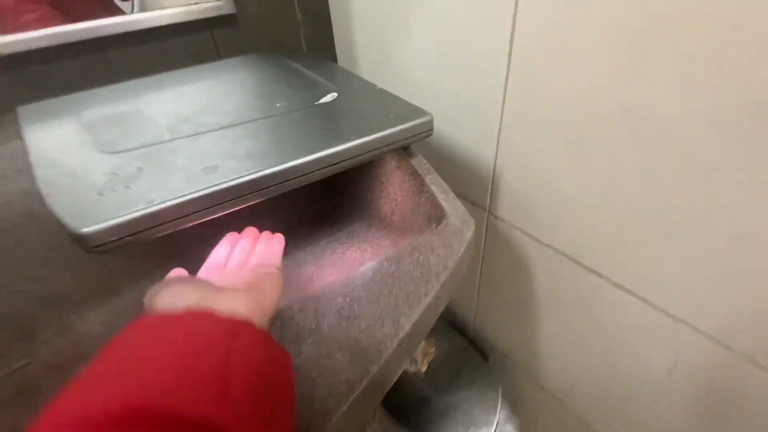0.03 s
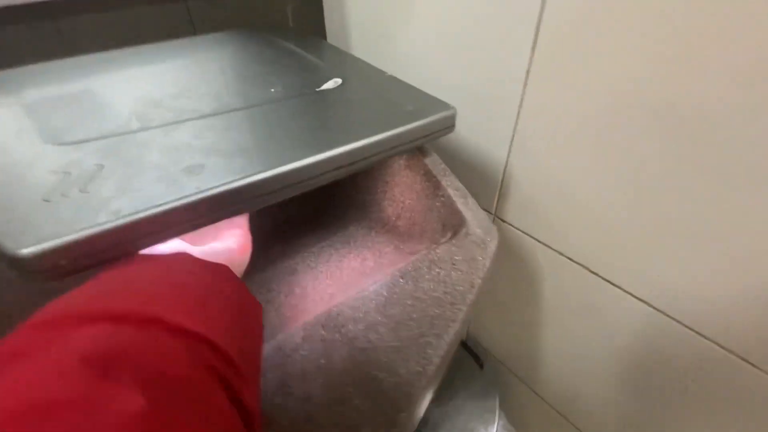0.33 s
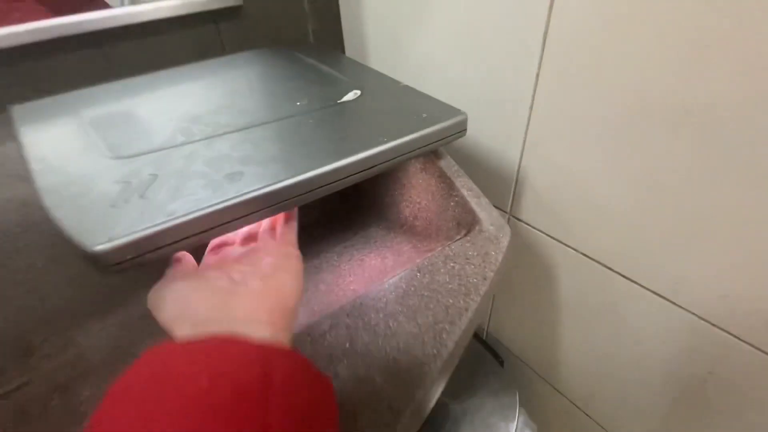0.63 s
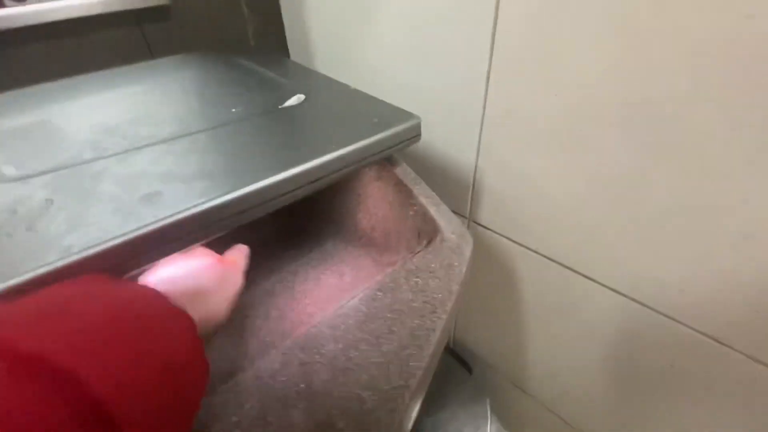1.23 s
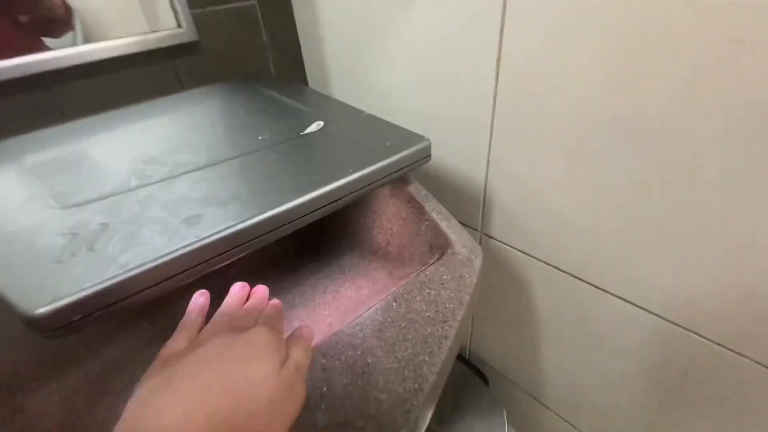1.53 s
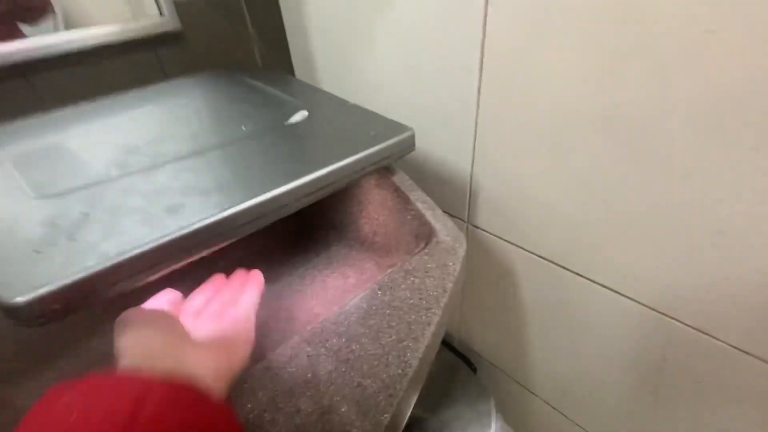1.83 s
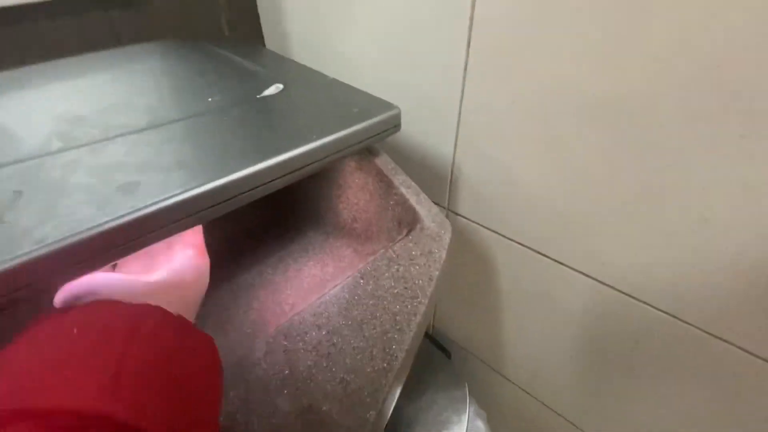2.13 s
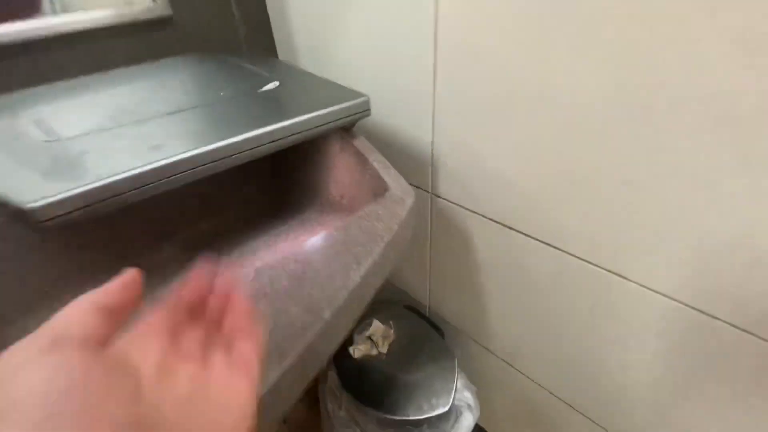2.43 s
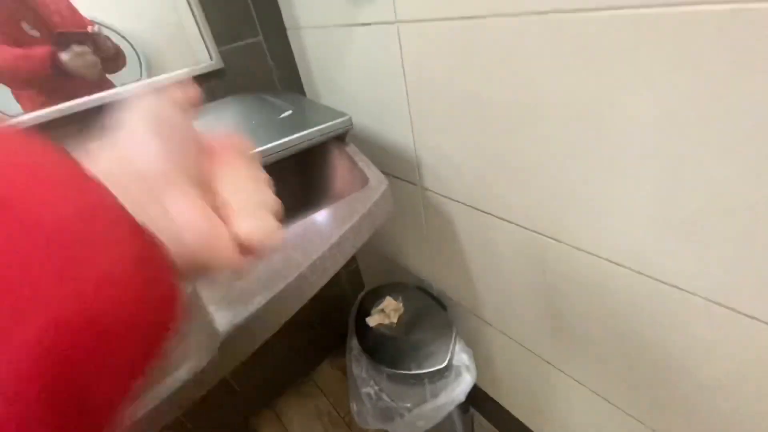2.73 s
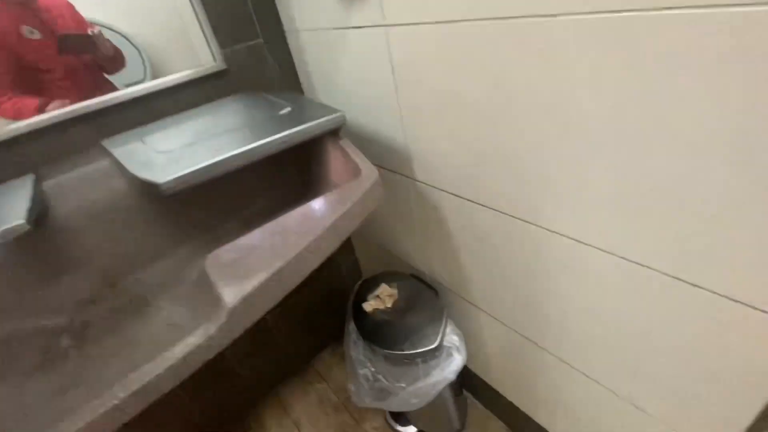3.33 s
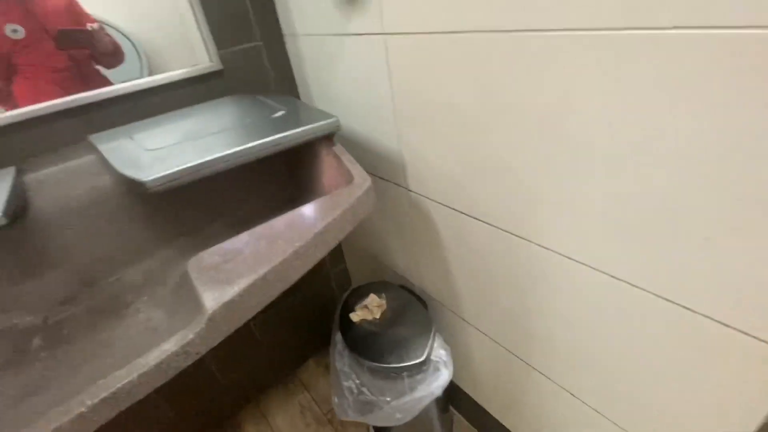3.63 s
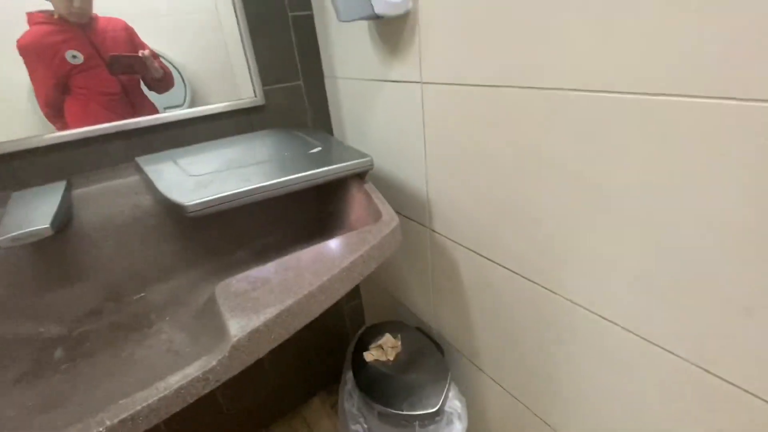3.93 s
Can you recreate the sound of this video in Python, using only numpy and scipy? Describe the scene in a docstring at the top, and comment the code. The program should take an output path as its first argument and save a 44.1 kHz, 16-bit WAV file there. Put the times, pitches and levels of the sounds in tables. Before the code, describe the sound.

Loud air rushes from a nearby hand dryer over a hum, a wavering whistle and a gusty rumble. The hiss brightens in spurts as a hand turns under it, then evens out in the small restroom.

```python
"""A hand dryer built into a washbasin blows a broad air jet in a small tiled restroom.
A hand moves in the jet, cutting it into bright hiss and cupping it into a hollow note. The turbine
hums at its shaft rate and whistles at its blade rate; housing, duct and basin ring in the air stream
over a gusty rumble. Then the hand withdraws and the listener steps back."""
import sys
import numpy as np
from scipy import signal
from scipy.fft import rfft, irfft
from scipy.io import wavfile
from scipy.ndimage import map_coordinates

SR = 44100
rng = np.random.default_rng(int(sys.argv[2]) if len(sys.argv) > 2 else 0)


def put_to_file(sound):
    """Save the sound as 16-bit audio at rate SR, in the file named by the first command-line argument."""
    columns = np.atleast_2d(sound).T  # one column per channel
    safe = np.clip(columns, -1, 1)
    whole_steps = np.round(safe * 32767)
    wavfile.write(sys.argv[1], SR, whole_steps.astype(np.int16))


N = 176400
T = np.arange(N) / SR
FREQS = np.arange(N // 2 + 1) * SR / N

# Air washing over hand and basin. Each row: time in seconds, level in dB.
WASH_LEVEL_DB = [(0, -28.5), (.5, -27.5), (.8, -30), (.95, -27), (1.1, -28.5), (1.45, -26), (1.62, -28.5),
                 (1.78, -28.5), (1.92, -27.5), (2.2, -30), (2.42, -37.5), (2.75, -34.5), (4, -49)]


def air_jet():
    """Turbulence of the free jet, of its wash over the hand and of the fingers cutting it."""
    # Free jet as the listener moves. Each row: time in seconds, level in dB.
    jet_level_db = [(0, -25.5), (1.2, -26.5), (2.3, -24.5), (2.65, -27), (2.8, -28), (3.25, -27.5),
                    (3.5, -26.5), (4, -26.5)]
    # Spectra of free jet, wash and cut jet. Each row: frequency in Hz, relative density in dB.
    jet_spectrum = [(150, -17), (300, -2), (650, 2), (1000, -2), (1400, -2.5), (2400, -3.5), (3500, -1.5),
                    (5500, 0.5), (8300, -0.3), (9500, -0.5), (11200, -5), (12000, -14), (15000, -14)]
    wash_spectrum = [(30, -13), (70, 0.5), (130, -2.5), (330, 2.5), (500, -4), (750, 1.5), (1500, -0.5),
                     (2200, 1), (3100, 0.5), (4500, 2), (7500, -2), (11000, -11), (15000, -16)]
    cut_spectrum = [(600, -5.5), (1400, -20), (1950, 5.5), (2800, 9.5), (3800, 5.5), (5000, 8.5),
                    (6600, 6.5), (8500, 7.5), (11000, 1), (13000, -10), (15000, -5)]
    jet = undb(curve(jet_level_db) + .12 * wander(rate_hz=9.8))
    wash = undb(curve(WASH_LEVEL_DB) + wander(rate_hz=42))
    layers = [(colour(jet_spectrum), jet),
              (colour(wash_spectrum), wash),
              (colour(cut_spectrum), finger_cuts())]
    return hand_shimmer(restroom(layers))


def finger_cuts():
    """Envelope of the spluttering hiss where the hand cuts the jet near the slot."""
    # Each row: start in seconds, end in seconds, level in dB.
    cuts = [(0.603, 0.712, -22.5), (0.75, 0.748, -26), (0.846, 0.852, -25.5), (1.43, 1.557, -33.5),
            (1.763, 1.824, -26.5), (2.266, 2.351, -22.5)]
    # A finger's edge crosses the slot. Each row: time in seconds, peak in dB.
    spurts = [(0.627, -31), (0.649, -31), (0.696, -35), (0.71, -34), (2.304, -30), (2.338, -33)]
    held = sum(undb(db) * gesture(start_s, end_s) for start_s, end_s, db in cuts)
    return (held + swells(spurts, width_s=.008)) * undb(1.3 * wander(rate_hz=60))


def hand_shimmer(hiss):
    """The moving hand recolours the hiss: half-octave bands drift in level, more in a strong wash."""
    band_position = np.clip(2 * np.log2((FREQS + 1) / 500), 0, 10)
    spectrum = rfft(hiss)
    wash_db = curve(WASH_LEVEL_DB)
    depth_db = 1.5 * undb(wash_db - wash_db.max())
    bands = (irfft(spectrum * np.maximum(1 - abs(band_position - k), 0), N) for k in range(11))
    return sum(band * undb(depth_db * wander(rate_hz=21)) for band in bands)


def cupped_palm():
    """The palm's cavity rings with a hollow note that rises as the hand turns in the jet."""
    # Each row: start and end in seconds, pitch at start and at end in Hz, width in Hz, level in dB.
    cups = [(0.635, 0.648, 1880, 1960, 90, -35), (0.65, 0.71, 2880, 2960, 220, -40),
            (1.44, 1.588, 2914, 3030, 210, -29), (1.65, 1.801, 3100, 3200, 550, -32)]
    notes = np.zeros((2, N))
    for start_s, end_s, from_hz, to_hz, width_hz, db in cups:
        glide_hz = (to_hz - from_hz) * np.clip((T - start_s) / max(end_s - start_s, .01), -1, 1)
        rings = signal.hilbert([noise(resonance(from_hz, width_hz)) for _ in range(2)])
        gliding = np.real(rings * np.exp(2j * np.pi * np.cumsum(glide_hz) / SR))
        notes += gliding * undb(db) * gesture(start_s, end_s)
    return notes


def turbine():
    """Shaft harmonics; the ninth is the blade whistle, swelling and fading among tile reflections."""
    # Harmonic levels. Each row: time in seconds, level in dB.
    hum_db = [(0, -45.5), (.9, -65), (1.15, -42), (1.6, -44), (1.95, -40.5), (2.4, -41), (2.9, -40),
              (4, -39.5)]
    whistle_db = [(0, -55), (.15, -35), (.27, -48), (.38, -40), (.5, -47), (.69, -40), (.745, -32),
                  (.8, -42), (.91, -35), (1.0, -38), (1.1, -45), (1.24, -33), (1.46, -34), (1.54, -50),
                  (1.9, -37.5), (2.12, -40), (2.2, -32), (2.28, -45), (2.41, -37), (2.52, -44), (2.61, -39),
                  (2.67, -28.5), (2.75, -52), (2.85, -46), (2.96, -39), (3.08, -37), (3.24, -43.5),
                  (3.39, -37.5), (3.49, -32.5), (3.64, -40), (3.79, -35.5), (3.88, -32.5), (4, -34.5)]
    octave_db = [(0, -50), (1.2, -47), (1.8, -45.5), (2.2, -49.5), (2.65, -49), (2.85, -60), (4, -53)]
    whine_db = [(0, -47), (2.3, -52), (2.45, -44), (2.7, -42), (2.81, -51), (2.97, -39), (3.22, -42),
                (3.4, -62), (3.65, -43), (4, -49)]
    shaft_hz = (515 + .25 * T) * (1 + .0003 * wander(rate_hz=2.8))
    shaft_rad = 2 * np.pi * np.cumsum(shaft_hz) / SR

    def harmonic(level_db, order, waver, pan_left_db, right_lag_rad):
        """One tone, scattered by the moving air separately in each channel."""
        scatter = np.array([1 + waver * (wander(35) + 1j * wander(41)) for _ in range(2)])
        phase_rad = np.array([order * shaft_rad, order * shaft_rad - right_lag_rad])
        tone = np.real(scatter * np.exp(1j * phase_rad))
        return unit_rms(tone * pan(pan_left_db)) * undb(curve(level_db))

    return (harmonic(hum_db, order=1, waver=.05, pan_left_db=8, right_lag_rad=1.3)
            + harmonic(whistle_db, order=9, waver=.3, pan_left_db=0, right_lag_rad=.9)
            + harmonic(octave_db, order=2, waver=.16, pan_left_db=18, right_lag_rad=1)
            + harmonic(whine_db, order=6, waver=.41, pan_left_db=8, right_lag_rad=1))


def housing():
    """Air rings the blower housing; one strong mode swells now and then."""
    # Each row: frequency in Hz, width in Hz, level in dB.
    modes = [(949, 29, -53.5), (1145, 66, -49), (1586, 32, -45), (1678, 34, -43.5), (1728, 66, -43.5),
             (3500, 58, -45.5)]
    # Swells of the fourth mode. Each row: time in seconds, peak in dB.
    mode_swells = [(0.34, -39), (1.13, -37), (1.5, -40), (2.2, -40), (2.7, -44.5), (3.23, -40), (3.76, -45)]
    rings = np.array([ringing(modes), ringing(modes)])
    hz, width_hz, _ = modes[3]
    surge = noise(resonance(hz, width_hz)) * swells(mode_swells, width_s=.081)
    return (rings + surge) * undb(wander(rate_hz=21))


def duct_drone():
    """Low resonances of duct and basin, nearly alike in both channels."""
    # Each row: frequency in Hz, width in Hz, level in dB.
    modes = [(81, 9.8, -49.5), (117.4, 21, -51), (168.7, 22, -45.5), (224.5, 15, -51.5), (293.2, 24, -46.5),
             (370, 17, -53.5)]
    mid, side = ringing(modes), .13 * ringing(modes)
    return np.array([mid + side, mid - side]) * pan(left_db=-.5)


def buffet():
    """Gusty rumble of the air stream."""
    # Each row: frequency in Hz, relative density in dB.
    rumble_spectrum = [(20, -24), (40, -12), (65, 1.5), (85, 9), (140, 3.5), (300, -19), (800, -45)]
    # Each row: time in seconds, level in dB.
    rumble_db = [(0, -44), (.17, -39.5), (.27, -51), (.42, -36.5), (.75, -46.5), (.9, -58), (1, -46),
                 (1.18, -42), (1.29, -40.5), (1.45, -55), (2.1, -44.5), (2.7, -60), (3.25, -69),
                 (3.42, -42), (3.7, -55), (4, -50)]
    gusts_db = 1.1 * wander(rate_hz=6)
    mid, side = noise(colour(rumble_spectrum)), .31 * noise(colour(rumble_spectrum))
    return np.array([mid + side, mid - side]) * undb(curve(rumble_db) + gusts_db)


def restroom(layers):
    """Noise from (spectral gain, envelope) layers, heard direct, reflected and as a diffuse field."""
    # Direct sound. Each row: time in seconds, lag of the right channel in ms.
    right_lag_ms = [(0, 0.43), (.6, 0.31), (2.4, 0.31), (3, 0.47), (4, 0.48)]
    # Echoes off basin, lid and tiles. Each row: left and right base delay in ms, gain in dB.
    echoes = [(1.25, 1.5, -9), (2.3, 2.0, -10.5), (4.1, 4.9, -6), (7.4, 6.2, -6), (11.3, 12.2, 0),
              (16.5, 15.4, -3)]
    # The listener sways and steps back. Each row: time in seconds, factor on the echo delays.
    path_stretch = [(0, 1.11), (1, 1.07), (2.3, 1.024), (2.8, 1.12), (4, 1.165)]
    t60_s, diffuse_db = .091, 5.5
    power_decay = np.exp(-np.log(1e6) / (t60_s * SR))
    source = sum(noise(gain) * envelope for gain, envelope in layers)
    stretch = curve(path_stretch)

    def delayed(ms):
        return map_coordinates(source, [(T - ms / 1000) * SR], order=3, mode="mirror", prefilter=False)

    def linger(envelope):
        power, _ = signal.lfilter([1 - power_decay], [1, -power_decay], envelope ** 2,
                                  zi=[envelope[0] ** 2])
        return np.sqrt(power)

    direct = np.array([delayed(0), delayed(curve(right_lag_ms))])
    reflected = sum(undb(db) * np.array([delayed(left_ms * stretch), delayed(right_ms * stretch)])
                    for left_ms, right_ms, db in echoes)
    diffuse = sum(np.array([noise(gain), noise(gain)]) * linger(envelope) for gain, envelope in layers)
    return unit_rms(direct + reflected + undb(diffuse_db) * diffuse) * np.std(source)


def gesture(start_s, end_s, attack_s=.059, release_s=.011):
    """Envelope of the hand: eases in before start_s, slips out after end_s."""
    return np.exp(np.minimum(T - start_s, 0) / attack_s - np.maximum(T - end_s, 0) / release_s)


def swells(rows, width_s):
    """Bell-shaped envelopes from (s, dB) rows."""
    return sum(undb(db) * np.exp(-((T - at_s) / width_s) ** 2) for at_s, db in rows)


def ringing(modes):
    """Resonances driven by turbulence."""
    return sum(undb(db) * noise(resonance(hz, width_hz)) for hz, width_hz, db in modes)


def resonance(hz, width_hz):
    """Spectral gain of a steep-skirted resonance."""
    return 1 / (1 + ((FREQS ** 2 - hz ** 2) / ((FREQS + 1) * width_hz * np.pi / 2)) ** 2)


def colour(rows):
    """Spectral gain from (Hz, dB) rows."""
    hz, db = np.array(rows, float).T
    return undb(np.interp(np.log(FREQS + 1), np.log(hz), db))


def noise(gain):
    """Noise shaped by a spectral gain, rms 1."""
    return unit_rms(irfft(rfft(rng.standard_normal(N)) * gain, N))


def wander(rate_hz):
    """Smooth random drift, rms 1."""
    return noise(np.exp(-(FREQS / rate_hz) ** 2))


def curve(rows):
    """Straight lines through (s, value) rows."""
    return np.interp(T, *np.array(rows, float).T)


def pan(left_db):
    """Channel gains, left over right by left_db."""
    return undb([[left_db / 2], [-left_db / 2]])


def undb(db):
    return 10 ** (np.asarray(db) / 20)


def unit_rms(x):
    return x / np.sqrt(np.mean(x ** 2))


def scene():
    """Jet and hand over the dryer's tones, resonances and rumble."""
    return air_jet() + cupped_palm() + housing() + turbine() + duct_drone() + buffet()


def record(dry):
    """Opposite colouring of the two channels, then a steep low-pass."""
    # Each row: frequency in Hz, left over right in dB.
    balance_db = [(60, 0.5), (200, -3), (370, -2), (690, 2), (1270, 2.5), (2330, -3), (4300, 1.5),
                  (7910, -1), (11000, -2), (14000, 1)]
    cutoff_hz = 15000
    tilt = np.sqrt(colour(balance_db))
    stereo = irfft(rfft(dry) * np.array([tilt, 1 / tilt]), N)
    return signal.sosfilt(signal.ellip(10, .2, 80, cutoff_hz, fs=SR, output="sos"), stereo)


dry = scene()
out = record(dry)
put_to_file(out)
```